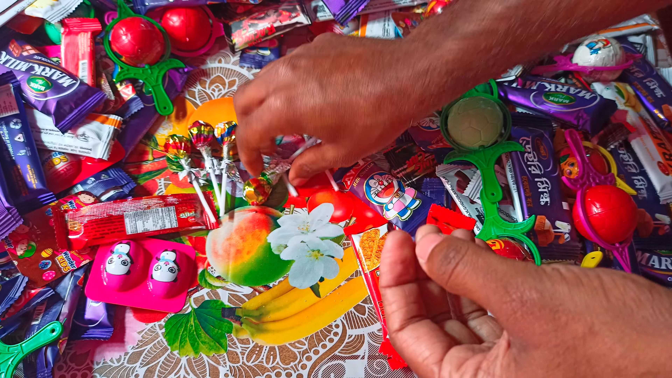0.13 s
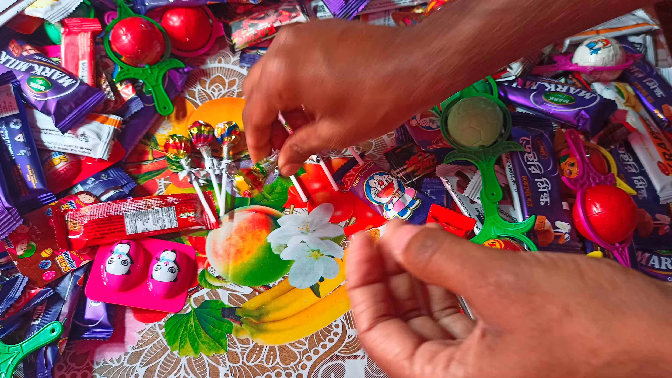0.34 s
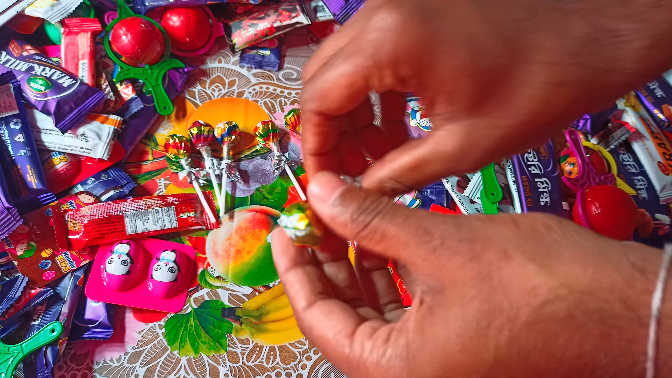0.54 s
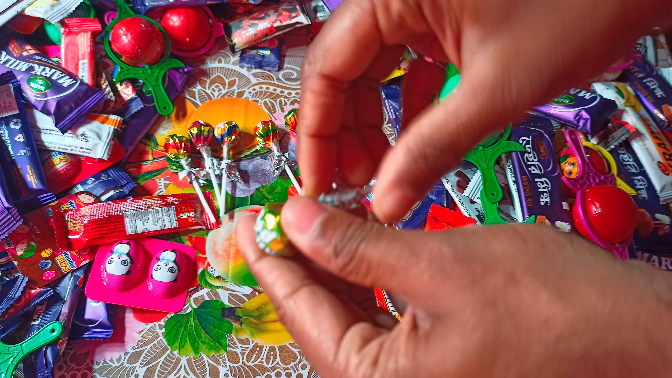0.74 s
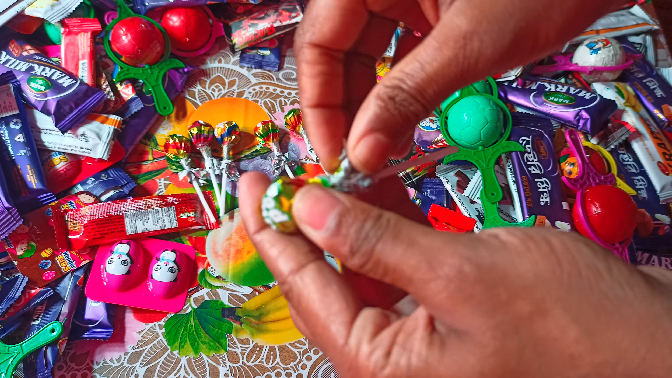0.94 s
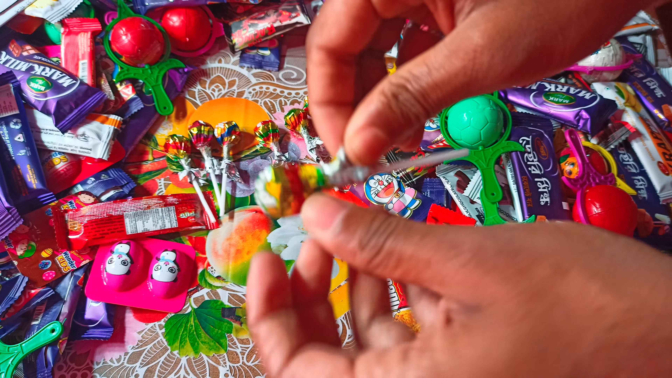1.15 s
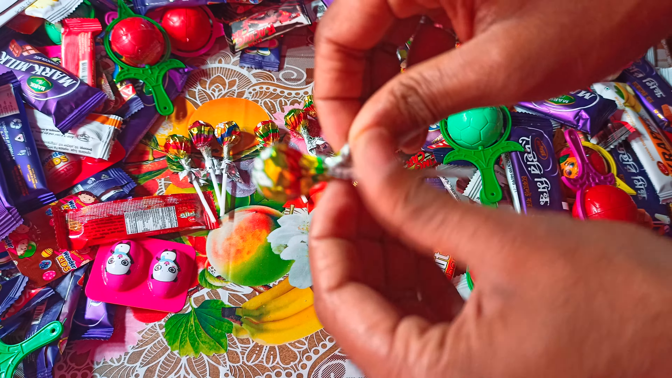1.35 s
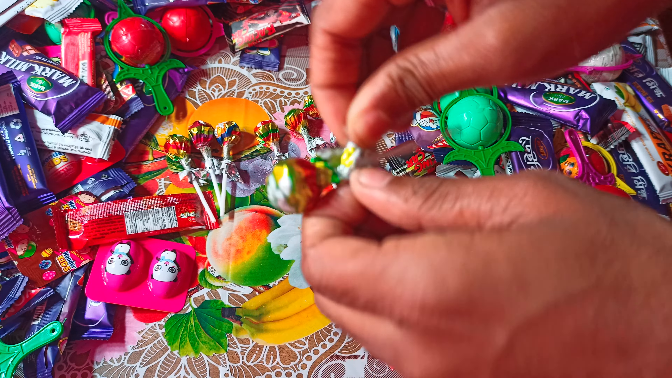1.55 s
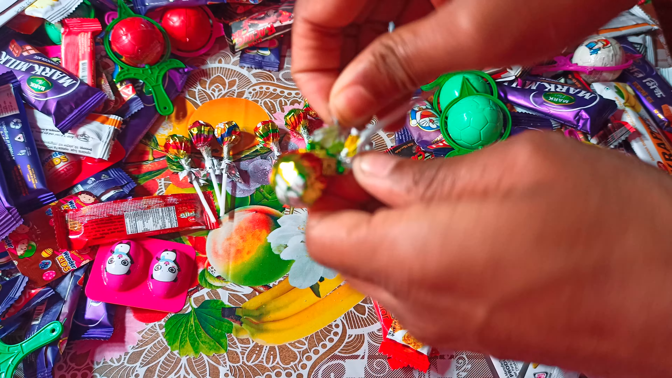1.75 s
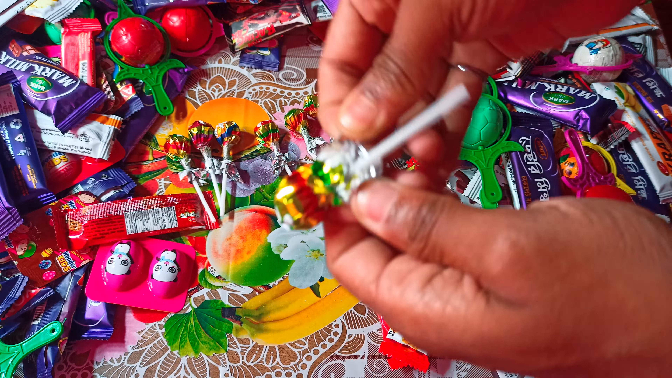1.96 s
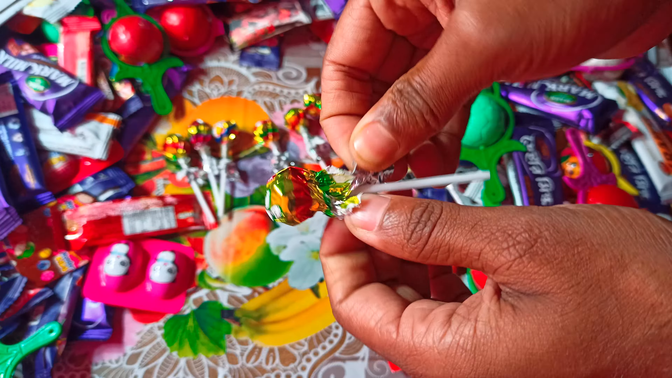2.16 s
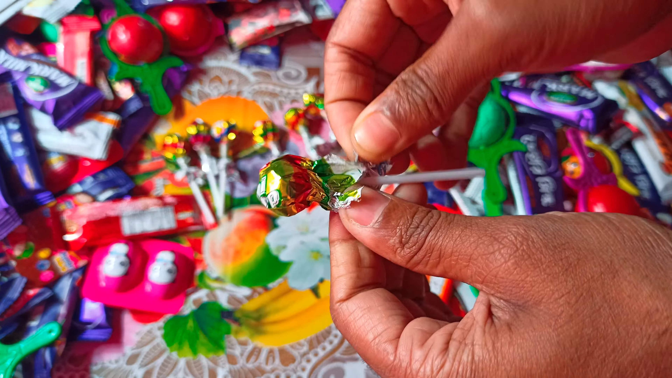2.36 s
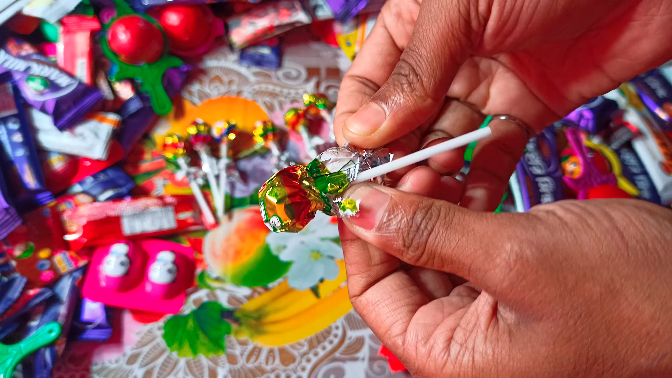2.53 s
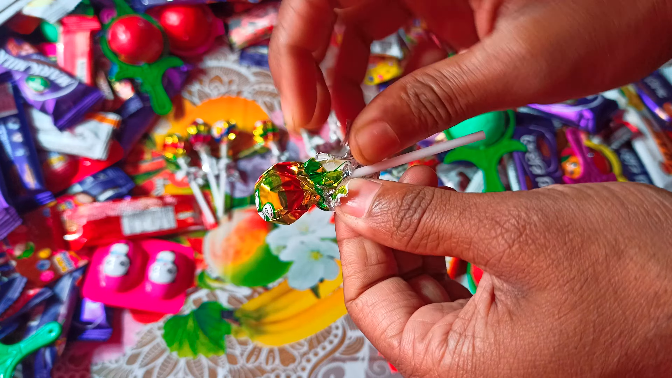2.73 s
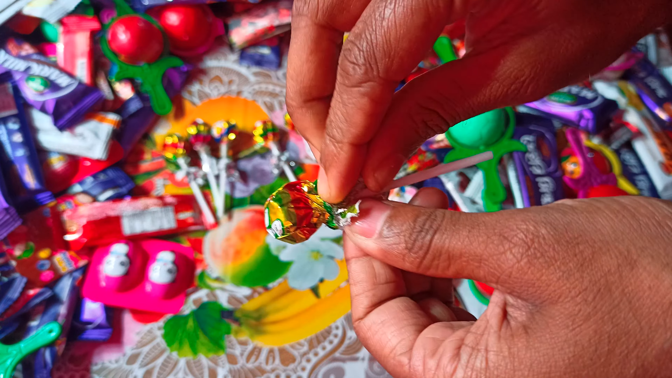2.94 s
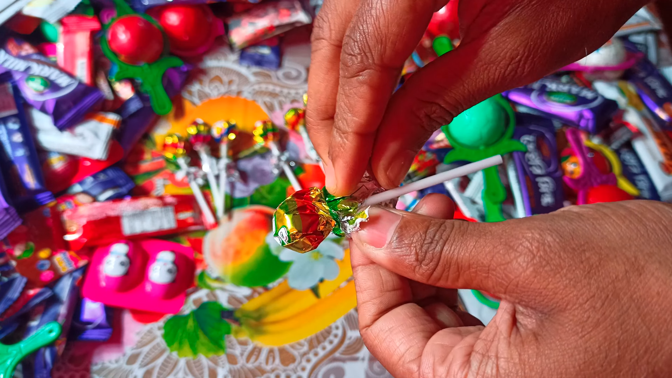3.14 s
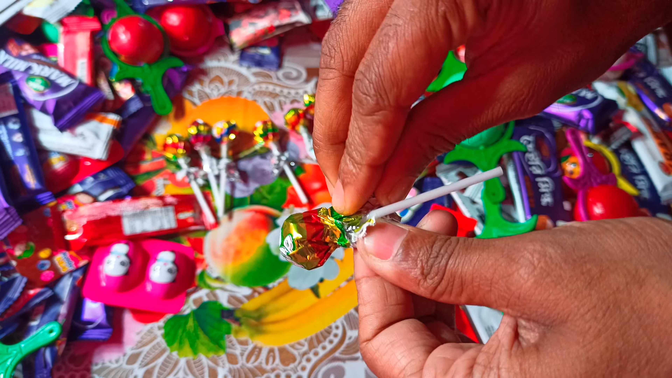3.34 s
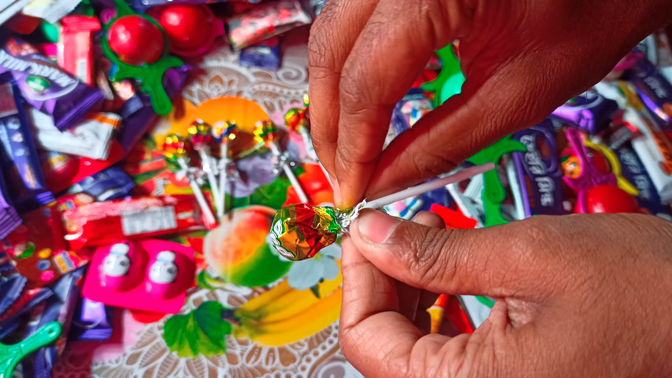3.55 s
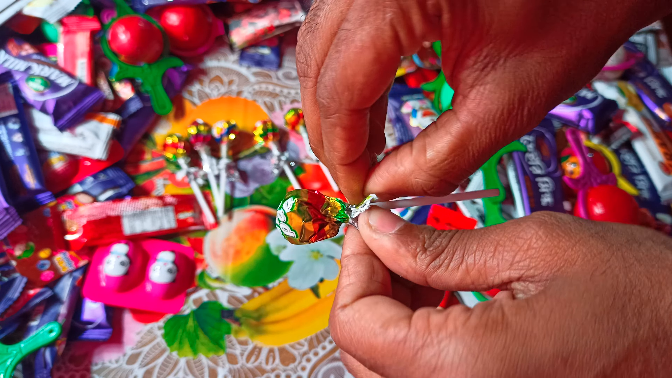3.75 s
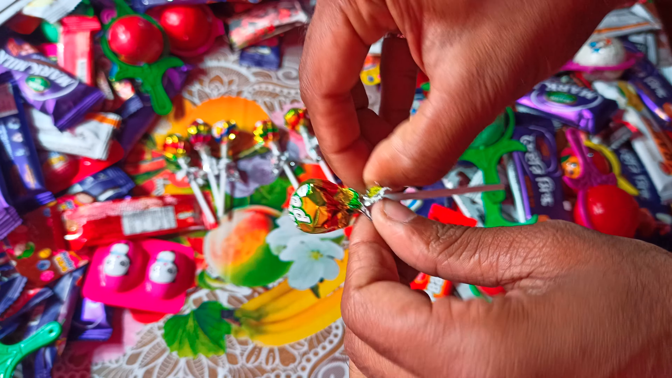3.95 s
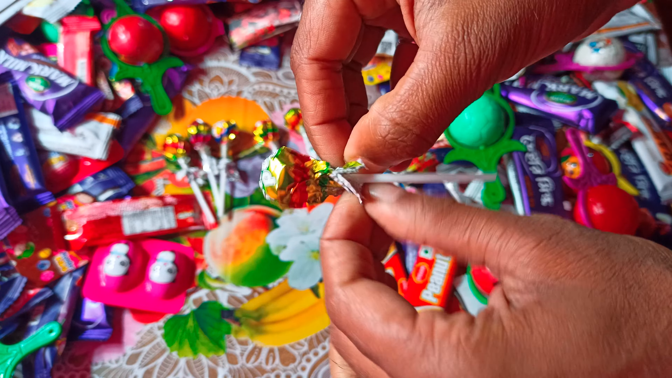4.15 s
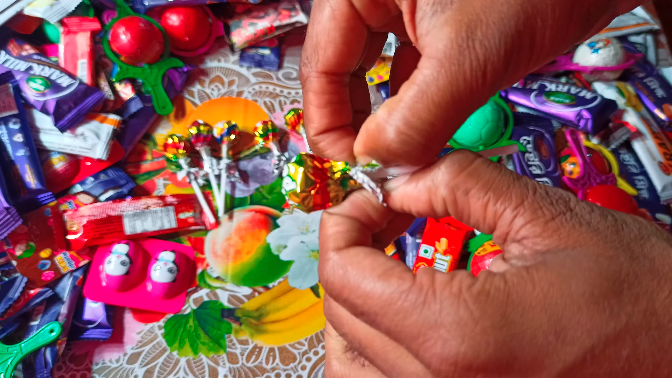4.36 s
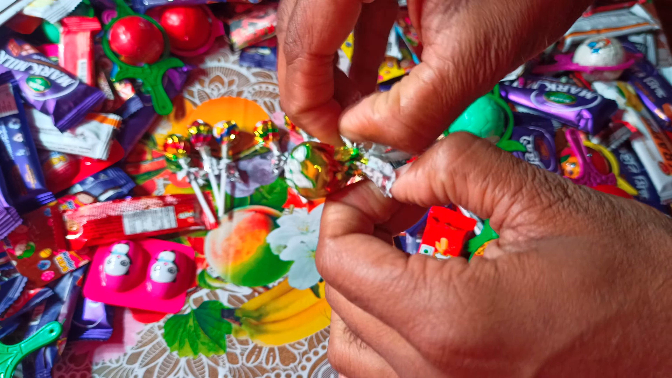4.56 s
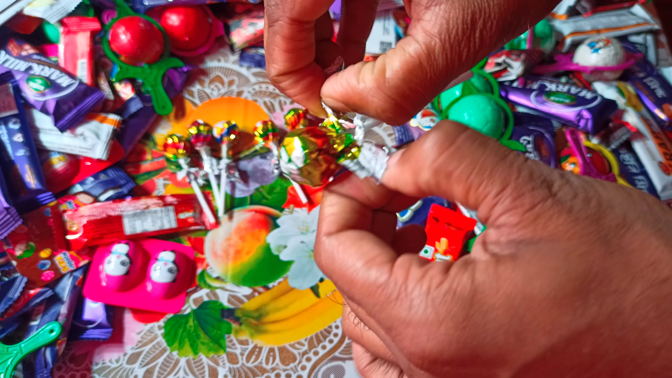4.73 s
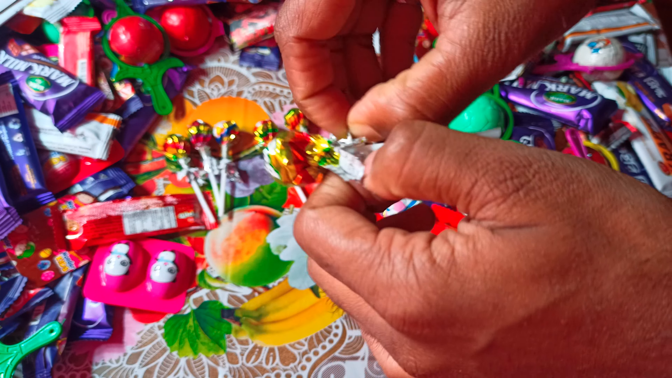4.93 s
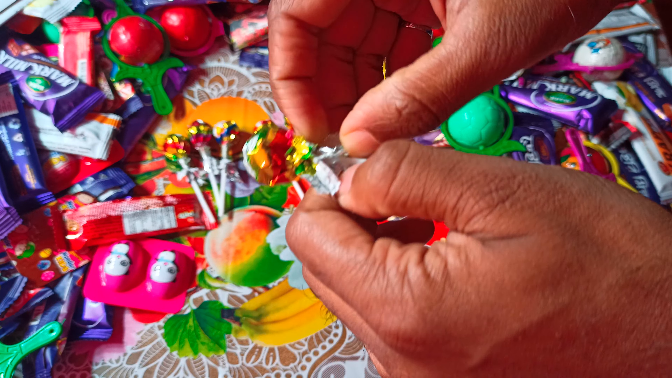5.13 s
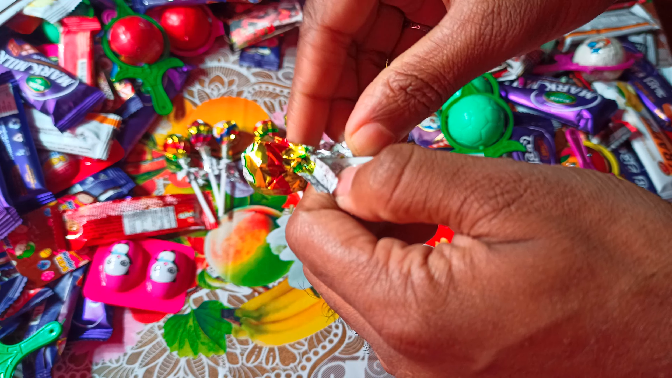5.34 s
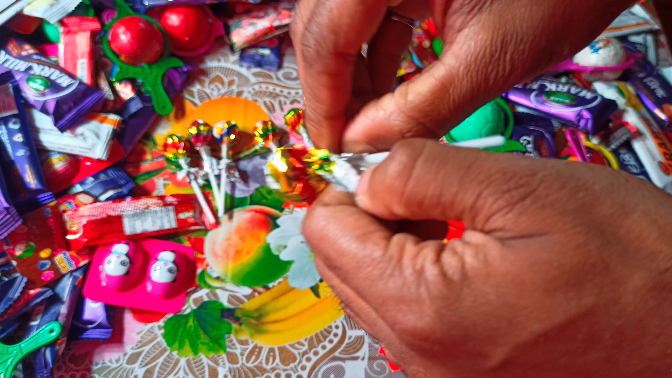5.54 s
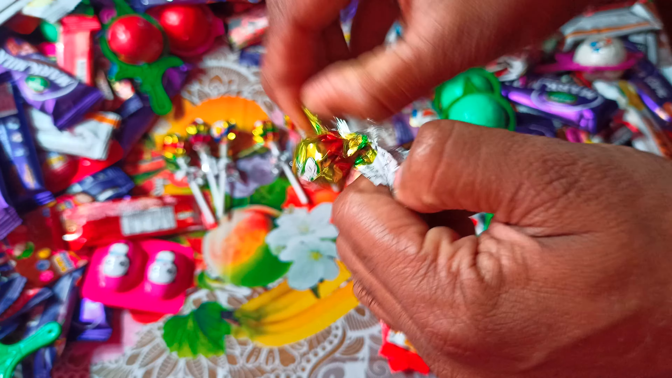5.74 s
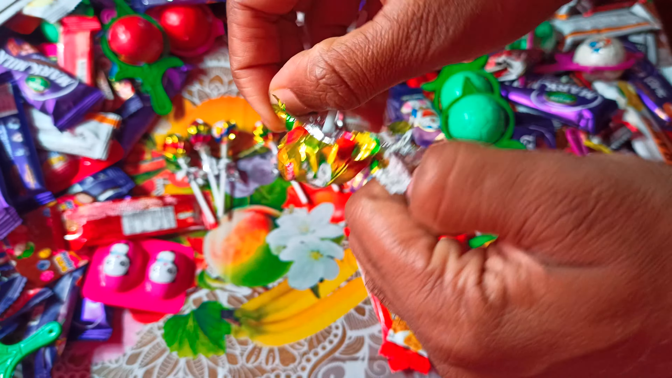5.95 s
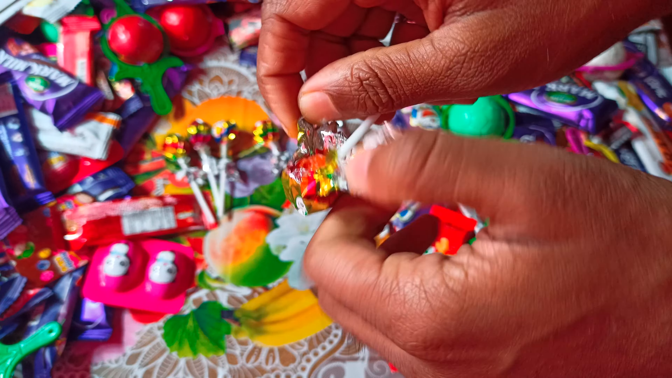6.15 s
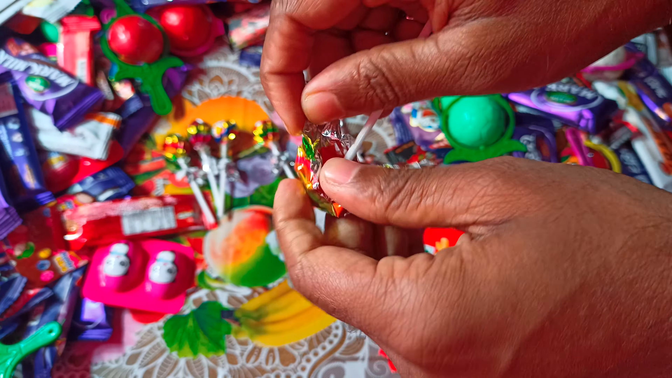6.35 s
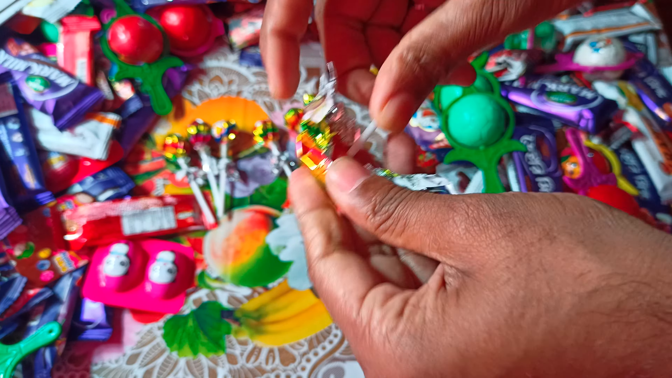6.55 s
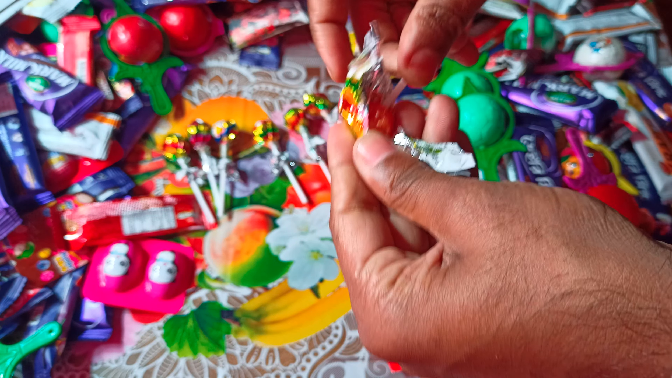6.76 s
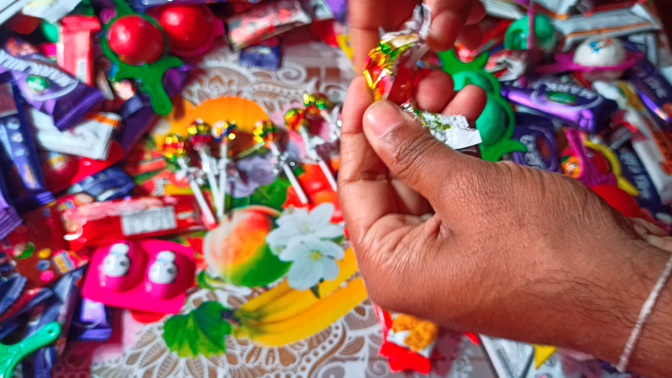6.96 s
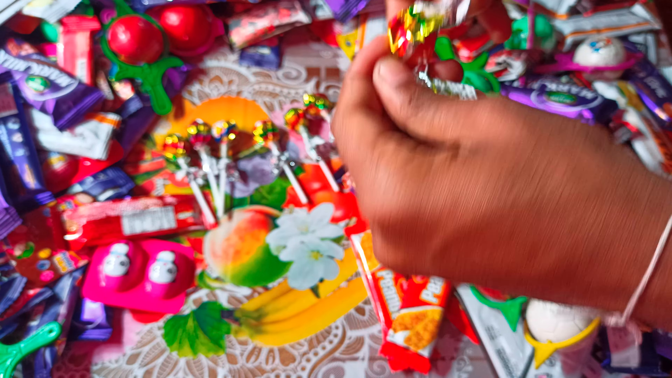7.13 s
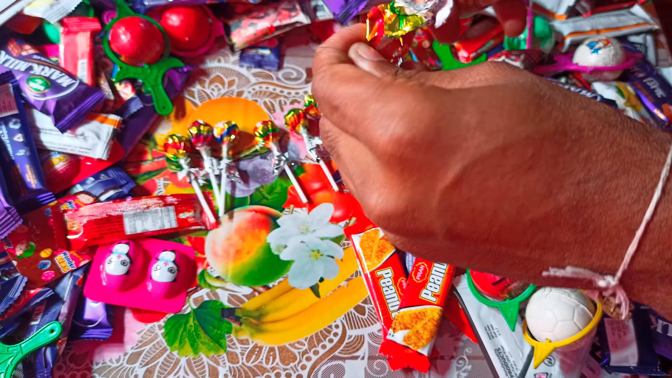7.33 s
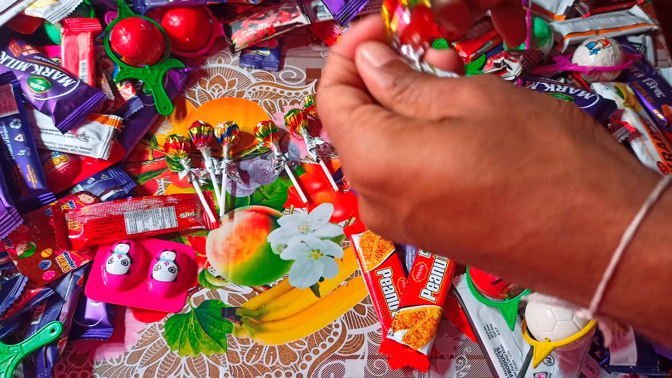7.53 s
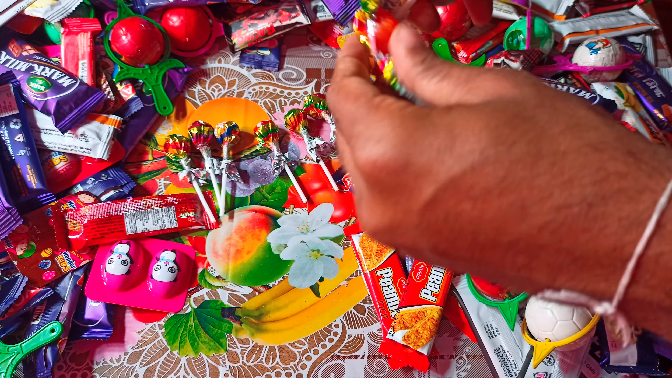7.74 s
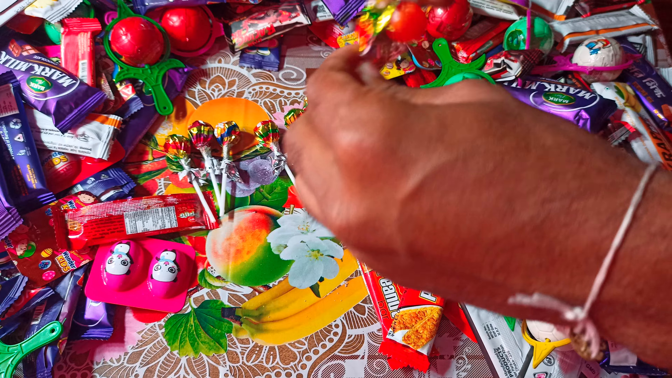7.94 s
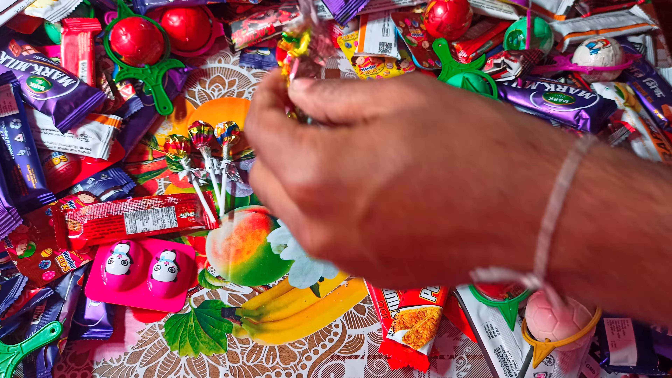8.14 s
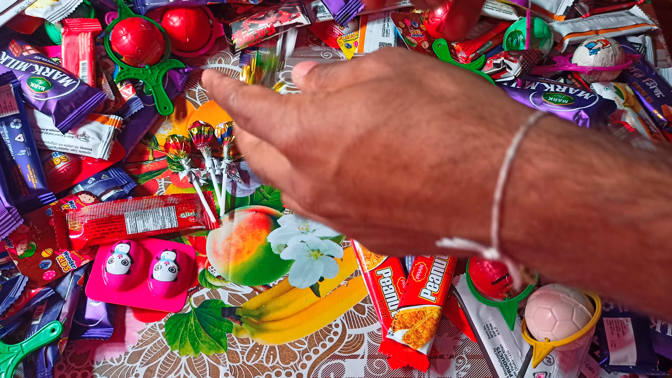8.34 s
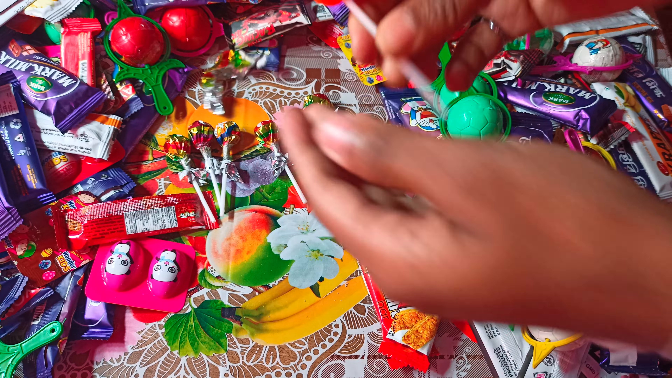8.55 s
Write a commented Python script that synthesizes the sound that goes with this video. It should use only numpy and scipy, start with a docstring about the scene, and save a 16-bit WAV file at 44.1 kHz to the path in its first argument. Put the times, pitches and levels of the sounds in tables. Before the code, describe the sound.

Dry, bright plastic film is twisted and peeled by hand, very near the microphone. It opens with dull low thuds and a brief rub, then isolated clicks and soft crinkle flurries. Strong crackles burst out midway and become fuller, almost continuous rustling with a few tiny pops as the wrapper comes off. Short room reflections surround it; the quiet background ducks whenever the wrapper rests.

```python
"""A plastic lollipop wrapper is twisted, crinkled and torn by fingers, close to a phone in a small quiet room.
Each crease radiates a spike and a dying puff of noise in four bands, singly or in swarms set off by squeezes.
Air pockets pop as decaying sines and the hand thuds as low noise bursts; far off, thin gliding tones whistle.
Shaped noise gives the room's air and low drone. The phone's noise suppressor follows the level and pulls
everything down whenever the wrapper rests."""
import sys
import numpy as np
from scipy import signal
from scipy.fft import rfft, irfft, next_fast_len
from scipy.io import wavfile
from scipy.ndimage import uniform_filter1d

SR = 44100
rng = np.random.default_rng(int(sys.argv[2]) if len(sys.argv) > 2 else 0)


def dump(signal):
    """Clip the signal to [-1, 1] and save it as 16-bit WAV at the path in sys.argv[1]."""
    limited = np.clip(np.atleast_2d(signal).T, -1, 1)
    pcm = np.round(limited * 32767).astype(np.int16)
    wavfile.write(sys.argv[1], SR, pcm)


N = 383222

# Loud crease snaps, before reflections and microphone: (time [s], main crease level [dB],
# broad fold against main [dB], fine edge against main [dB])
CREASE_SNAPS = [(0.1857, -41.5, -17, -13), (0.1951, -38.5, -24, 1), (0.2772, -44, -12, -14),
                (0.3543, -33, -30, -5), (0.7322, -44, -20, 0), (0.7417, -37.5, -24, -5),
                (0.7905, -39, -6, -17), (1.0844, -45, -16, 2), (1.098, -35, -29, -8),
                (1.1063, -39, -20, -15), (1.1114, -35.5, -18, -2), (1.1819, -43, -28, 3),
                (1.189, -36.5, -27, 0), (1.2227, -32, -19, -1.5), (1.3639, -42.5, -19, -9),
                (1.4013, -36.5, -30, -7), (1.446, -42, -12, -11), (1.5324, -39.5, -18, -9),
                (1.563, -44.5, -22, -11), (1.6424, -33.5, -24.5, -3), (1.651, -31.5, -19, -13),
                (1.657, -34, -51.5, -4), (1.6617, -31.5, -26, -9), (1.671, -29.5, -28, -5),
                (1.6878, -28, -35, -9), (1.8399, -34, -18, -2), (1.8539, -34.5, -25, -1),
                (1.874, -35, -25, -16), (1.898, -35, -33, 3), (1.9083, -42, -33, 3), (1.9475, -43, -29, 7),
                (1.9758, -41, -23, 8.5), (1.986, -44, -38, 9), (1.9938, -45, -25, 10.5),
                (2.0087, -45, -28, 9), (2.0632, -35.5, -20, 6.5), (2.0841, -39, -15, -10),
                (2.1375, -54.5, -3, 11), (2.253, -30.5, -15.5, -6), (2.3048, -33.5, -39, -6),
                (2.3114, -34, -41, -15), (2.5525, -38.5, -50, -3), (2.6138, -43, -40, -0.5),
                (2.627, -46, -42, -2), (2.6508, -46.5, -38, -3), (2.8115, -56.5, -20, 12),
                (2.818, -46, -37, -11), (2.9386, -48, -13, -5), (2.9627, -53.5, -11, 11.5),
                (3.1062, -47.5, -40, -2), (3.3717, -35.5, -26, -11), (3.4138, -52.5, -13, 7),
                (3.4796, -55.5, -17, 13.5), (3.6244, -49, -33, -3), (3.6521, -45.5, -38, 1),
                (3.7419, -44, -26, 8.5), (3.7494, -39, -25, -2), (3.8476, -46, -15, 8.5),
                (3.8648, -49.5, -12, 9.5), (3.9061, -36, -21, 0), (3.9132, -39, -21, 4),
                (3.9258, -43, -11, 4), (3.9379, -46, -24, 7), (3.9547, -43.5, -13, 2),
                (3.9953, -40, -17, -4), (4.026, -39, -24, -2), (4.0585, -51, -7, 13),
                (4.144, -35.5, -42, -23), (4.2373, -37, -18, 5), (4.245, -39, -29, -56),
                (4.3253, -28.5, -22.5, 1.5), (4.4042, -34, -18, 7), (4.4086, -24.5, -22, 1),
                (4.4509, -36, -28, 6), (4.5201, -18.5, -32.5, -5), (4.5308, -25, -19.5, -4),
                (4.5397, -24.5, -38.5, -1.5), (4.5506, -17.5, -22.5, -5.5), (4.5595, -20, -34, 2),
                (4.644, -45, -27, 13), (4.671, -19.5, -13.5, -2), (4.7174, -18.5, -13.5, -2.5),
                (4.7247, -21.5, -17, -11), (4.8574, -32.5, -16, 0.5), (4.8664, -33, -6, -1),
                (4.9214, -27.5, -9.5, 0.5), (4.977, -32, -9.5, -3), (4.9833, -37, -6.5, -3),
                (5.015, -23, -19.5, -3), (5.0274, -35, -12, 3), (5.0705, -40, -6, 3), (5.1545, -41, -2, -7),
                (5.1644, -34.5, -28, 0), (5.1842, -31.5, -19, -2), (5.232, -43.5, -8.5, 3.5),
                (5.3527, -42, -5.5, -1), (5.442, -42.5, -9, -6), (5.5783, -31, -8, -0.5),
                (5.6002, -40, -24, 5), (5.631, -39.5, -32, -12), (5.683, -32, -7.5, 2),
                (5.6976, -26.5, -15.5, -6), (5.7196, -16.5, -20.5, -18), (5.7609, -30.5, -29, -4),
                (5.7847, -32.5, -18, -8), (5.8282, -20.5, -5.5, -6), (5.8339, -32, -53, 6),
                (5.8544, -19, -16.5, 3), (5.8844, -27, -28.5, -19), (5.9657, -23, -21.5, -5.5),
                (5.99, -30, -39, -7), (5.9991, -30, -39, -6), (6.014, -36, -31, -2),
                (6.0366, -33.5, -40, -1), (6.0552, -33.5, -25, -3), (6.0697, -28, -20.5, -9),
                (6.0783, -35, -5, 1), (6.0961, -28, -3, -2), (6.185, -40, 10, 4), (6.192, -35.5, 8, 5),
                (6.2091, -36.5, 1, 4.5), (6.2808, -36.5, -2, -6), (6.303, -32.5, -13, -1),
                (6.3092, -38, 5.5, -3), (6.3487, -29.5, -8, -10.5), (6.3946, -34, -22, -2.5),
                (6.447, -37, -1, -12), (6.4638, -20, -13, -5), (6.4754, -18, -6.5, -10),
                (6.4828, -32.5, 2, 0), (6.4893, -31, -7, -6), (6.5284, -22.5, -13, -13),
                (6.5825, -31.5, -2, -15), (6.5996, -38, -1, 8.5), (6.61, -35.5, -53, -7),
                (6.6236, -32, -13, -7), (6.663, -31, -27, -1.5), (6.681, -24.5, -45, 0),
                (6.7022, -29.5, -6, -12.5), (6.7297, -25, -13, -9), (6.7617, -26.5, 3, 3),
                (6.7771, -30, -14, -5), (6.7862, -25.5, -22.5, -0.5), (6.8076, -21.5, -12, -4.5),
                (6.8235, -28, -8.5, -19.5), (6.8608, -27, -5, -12), (6.8787, -21.5, -37, -6.5),
                (6.9264, -18, -26.5, -4), (7.0602, -42.5, -1, 3.5), (7.122, -36.5, -15, -7),
                (7.1275, -40, -9.5, 1), (7.135, -35, -13, 5.5), (7.1583, -33, -7, -1),
                (7.1702, -32.5, -11.5, 5.5), (7.2384, -35.5, -6.5, -1), (7.2547, -26, -13, -1),
                (7.2743, -26.5, -10, -10), (7.2939, -25.5, -5.5, -8), (7.3123, -41.5, 7, -16),
                (7.3668, -38.5, -12, 5), (7.3893, -29, -29, -2), (7.4255, -33, -2.5, -5),
                (7.4462, -36.5, -5, -6), (7.5029, -28.5, -19.5, -3), (7.5146, -34, -18, 7.5),
                (7.5215, -36.5, -33, -5), (7.5573, -33.5, -12, -3), (7.5805, -40, -17, -13),
                (7.6588, -26.5, -19.5, -2), (7.7047, -31, -13, -1), (7.714, -29.5, -3, 1),
                (7.7328, -38, -7, 9.5), (7.7435, -37, -20, -4), (7.7725, -26.5, -33, 2),
                (7.8319, -33, -5.5, -26), (7.8426, -26.5, -12.5, -9), (7.855, -27.5, -40, 2),
                (7.912, -36, -28, 2.5), (7.9487, -27.5, -24, -6), (7.9747, -29.5, -8, 4.5),
                (7.9828, -19, -23, -6), (8.0035, -19.5, -12.5, -11), (8.0196, -28, -40, -13),
                (8.0278, -30, 4.5, -2), (8.0456, -33, -22, 5), (8.254, -42, -3, -8),
                (8.2599, -27.5, -11, -16), (8.321, -35.5, -14, -5), (8.5169, -39.5, -3.5, -8.5),
                (8.5516, -57, 19.5, -5)]
# Four crease sizes, broad fold, middle, main, fine edge: (low edge [Hz], high edge [Hz],
# snap t60 [s], room t60 [s], room level against near sound [dB])
CREASE_SIZES = [(550, 3530, 0.015, 0.39, -10.5), (2710, 5630, 0.022, 0.32, -9.5),
                (5720, 9400, 0.012, 0.33, -13), (8850, 15200, 0.015, 0.11, -13)]
# Share of each crease size in the swarm, in the same order: (level [dB])
SWARM_SIZE_DB = (1, 0, -1.5, -1)
# Finger squeezes or twists, each setting off a swarm of small creases:
# (time [s], hold [s], level [dB], fine edges against it [dB])
FINGER_SQUEEZES = [(0, 0.01, -54.5, 3.5), (.21, 0.12, -48, -4.5), (.485, 0.04, -55, -9),
                   (0.618, 0.067, -46, -2.5), (.79, 0.0091, -47, -1), (0.898, .19, -50.5, 1),
                   (1.14, 0.093, -44, -3.5), (1.41, 0.035, -56, -7), (1.48, 0.048, -49.5, 4),
                   (1.6, 0.022, -49, -1), (1.658, 0.032, -35, 5), (1.858, 0.057, -37, 7.5),
                   (2.08, 0.24, -48, 4.5), (2.3, 0.01, -42.5, -4), (2.4, 0.077, -53, 3.5),
                   (2.508, 0.013, -42.5, 4.5), (2.76, 0.035, -53.5, -4), (2.82, 0.0045, -53, -1),
                   (2.98, .01, -52.5, 0), (3.13, .1, -60, -5), (3.37, 0.086, -52, -8),
                   (3.52, .1, -62.5, 11), (3.68, 0.063, -51, 1), (3.76, 0.022, -41, 4),
                   (3.92, 0.12, -52, 5), (4.128, 0.0042, -37.5, 1.5), (4.26, 0.028, -43, 4),
                   (4.42, 0.015, -46.5, 9), (4.546, 0.004, -31, -0.5), (4.719, 0.015, -31.5, 1),
                   (4.92, 0.13, -42, 0), (5.1, 0.15, -43.5, -7), (5.37, 0.34, -55.5, 2.5),
                   (5.588, 0.031, -35, -1), (5.71, 0.014, -32.5, -5), (5.839, 0.05, -30.5, -0.5),
                   (6.148, 0.11, -37, -3), (6.476, 0.0045, -35, -3), (6.6, 0.19, -47.5, 1),
                   (7.03, 0.044, -53.5, 6), (7.14, .04, -43, -9), (7.28, .2, -48.5, 4.5),
                   (7.62, 0.042, -46, 3.5), (7.7, 0.15, -39, -2.5), (7.992, 0.036, -33.5, -1),
                   (8.17, .06, -53.5, 0.5), (8.278, 0.02, -43.5, -2.5), (8.528, 0.071, -48.5, -6)]
# The foil comes loose, broad folds in the swarm: (time [s], level [dB])
LOOSE_FOIL = [(0, -5.5), (.5, -16.5), (2, -24), (4, -18.5), (5.5, -20), (6.2, -6.5), (7, -12.5), (8.69, -5)]
# Reflections from hands and table: (delay [s], level [dB])
NEAR_REFLECTIONS = [(.0023, -16.5), (.0043, -13.5), (.0075, -20)]
# Microphone response to the wrapper: (frequency [Hz], gain [dB])
MICROPHONE_COLOUR = [(300, -5), (1100, -7), (1550, 2.5), (3000, -5.5), (3800, 1), (6000, 1.5), (7500, 7),
                     (9500, 0), (12000, -1), (15000, 11)]
# Air pockets giving way: (time [s], level [dB], frequency [Hz], t60 [s])
AIR_POPS = [(5.854, -51, 870, 0.0065), (6.9265, -29.5, 424, 0.0054), (8.0285, -29, 590, 0.028),
            (8.073, -43, 620, .04)]
# Hand in the sweets: (time [s], level [dB], centre frequency [Hz], t60 [s])
HAND_THUDS = [(0, -37, 130, 0.18), (.034, -39.5, 144, 0.47), (0.188, -62, 138, 0.22),
              (.256, -39.5, 122, 0.11), (0.299, -49, 150, 0.22)]
# Faint far whistles: (time [s], length [s], first pitch [Hz], last pitch [Hz], level [dB])
FAR_WHISTLES = [(.46, 0.18, 2900, 2840, -72), (3.132, 0.18, 2720, 2610, -60)]
# Spectrum of the room air: (frequency [Hz], relative density [dB per Hz])
ROOM_AIR = [(15, -24), (25, -34), (108, -0.5), (309, -6.5), (516, -10.5), (1160, -22.5), (2160, -26),
            (2610, -21.5), (3250, -23.5), (5880, -23.5), (7110, -26.5), (11600, -30), (16000, -17.5)]
# Wavering drone: (centre frequency [Hz], Gaussian width [Hz], level [dB])
ROOM_HUM = [(56.4, 7.7, -70), (83.3, 4.6, -64.5), (99.9, 2.2, -61), (161.7, 9.2, -69), (192.3, 11, -65.5)]

# The middle crease lies between the broad fold and the main one, with random scatter
MIDDLE_SHARE, MIDDLE_DB, MIDDLE_SCATTER_DB = 0.48, 1.37, 6
SWARM_CREASES_PER_S = 500
SWELL_DB_PER_S, SETTLE_DB_PER_S = 332, 228  # build-up before a squeeze, decay after it
CLICK = 7.25  # one-sample flip of a crease, against the noise after it
SPIKE_T60_S, SPIKE_RISE_S = 0.0008, 0.00011
ROOM_DELAY_SAMPLES = 300
WHISTLE_EDGE_S = 0.017
LOW_CUT_HZ, TOP_HZ = 40, 16000


def amp(db):
    """Decibel law: amplitude grows tenfold every 20 dB."""
    return 10 ** (np.asarray(db) / 20)


def unit(x):
    """Normalization to unit root-mean-square amplitude."""
    return x / np.sqrt(np.mean(x ** 2) + 1e-20)


def along(points, hz):
    """Linear interpolation of (frequency, value) points on a logarithmic frequency axis."""
    f, v = np.transpose(points)
    return np.interp(np.log(hz + 1), np.log(f + 1), v)


def filtered(x, response):
    """Linear filtering: the spectrum is multiplied by a frequency response."""
    m = next_fast_len(N + SR // 4)
    spectrum = rfft(x, m) * response(np.fft.rfftfreq(m, 1 / SR))
    return irfft(spectrum, m)[:N]


def band(x, lo_hz, hi_hz):
    """Causal band-pass, with gain restoring the power white noise loses outside the band."""
    sos = signal.butter(3, [lo_hz, min(hi_hz, SR * .45)], "band", fs=SR, output="sos")
    return signal.sosfilt(sos, x) * np.sqrt(SR / 2 / (hi_hz - lo_hz))


def fading(power, t60):
    """Exponential energy decay: power falls 60 dB in t60, its sum conserved."""
    keep = amp(-120 / (t60 * SR))
    return np.abs(signal.lfilter([1 - keep], [1, -keep], power))


def wrapper():
    """Buckling film: creases release impulsive noise, reflected nearby and reverberated by the room."""
    s, main_db, fold_db, edge_db = np.transpose(CREASE_SNAPS)
    scatter_db = MIDDLE_SCATTER_DB * rng.standard_normal(len(s))
    middle_db = MIDDLE_DB + MIDDLE_SHARE * fold_db + scatter_db
    snap_db = main_db + np.array([fold_db, middle_db, 0 * s, edge_db])

    # Columns drawn: time, overall size, then one spread for each crease size
    draw = rng.random((int(SWARM_CREASES_PER_S * N / SR), 6))
    when = draw[:, 0] * N / SR
    level_db, bright_db = squeezes(when)
    size_db = level_db - 5.29 * np.log(draw[:, 1] + 0.018) - 14.5  # many small, few large

    out = np.zeros(N)
    for k, (lo_hz, hi_hz, t60, room_t60, room_db) in enumerate(CREASE_SIZES):
        swarm_db = size_db + SWARM_SIZE_DB[k] + 9 * (draw[:, 2 + k] - .5)
        if k < 2:  # the two lower bands follow the loosening foil, the second less strongly
            loose_db = np.interp(when, *np.transpose(LOOSE_FOIL))
            swarm_db = swarm_db + loose_db / (1 + 1.85 * k)
        if k == 3:
            swarm_db = swarm_db + bright_db
        near = bursts(s, snap_db[k], t60, spike=5.7, length=1000)
        near += bursts(when, swarm_db, 0.49 * t60, spike=0.35, length=256)
        near = near + sum(amp(db) * np.pad(near, (round(d * SR), 0))[:N] for d, db in NEAR_REFLECTIONS)

        # Diffuse reverberation: noise whose power follows the delayed, fading near sound
        delayed = np.pad(near, (ROOM_DELAY_SAMPLES, 0))[:N]
        room = rng.standard_normal(N) * np.sqrt(fading(delayed ** 2, room_t60))
        out += band(near + amp(room_db) * room, lo_hz, hi_hz)
    return filtered(out, lambda hz: amp(along(MICROPHONE_COLOUR, hz)))


def bursts(s, db, t60, spike, length):
    """Impulsive release: a quick spike and dying noise, scaled by the level of the first 2 ms."""
    t = np.arange(length) / SR
    decay = amp(-60 * t / t60) + spike * amp(-60 * t / SPIKE_T60_S)
    rise = 1 - np.exp(-t / SPIKE_RISE_S)
    shape = rng.standard_normal((len(s), length)) * decay * rise
    shape[:, 2] += CLICK * spike / (1 + spike)
    shape /= np.sqrt(np.mean(shape[:, :SR // 500] ** 2, axis=1, keepdims=True))
    at = np.round(np.asarray(s) * SR).astype(int)[:, None] + np.arange(length)
    pressure = shape * amp(db)[:, None]
    return np.bincount(at.ravel(), pressure.ravel(), N + SR)[:N]


def squeezes(when):
    """Power summation of all squeezes, giving swarm level and power-weighted fine-edge level."""
    s, hold, db, edge_db = np.transpose(FINGER_SQUEEZES)[:, :, None]
    early = np.maximum(s - when, 0)
    late = np.maximum(when - s - hold, 0)
    envelope_db = db - SWELL_DB_PER_S * early - SETTLE_DB_PER_S * late
    power = amp(2 * envelope_db) + 1e-30
    total = power.sum(0)
    return 10 * np.log10(total), (power * edge_db).sum(0) / total


def pops():
    """Damped resonance: each air pocket in the folded foil gives one short decaying sine."""
    out, t = np.zeros(N), np.arange(SR // 10) / SR
    for s, db, hz, t60 in AIR_POPS:
        swing = amp(db - 60 * t / t60) * np.sin(2 * np.pi * hz * t)
        out[round(s * SR):][:len(t)] -= swing
    return out


def thuds():
    """Damped soft impact: the hand in the heap gives low noise bumps and a fading rub on packets."""
    out, t = np.zeros(N), np.arange(SR // 3) / SR
    for s, db, hz, t60 in HAND_THUDS:
        # The first half of the noise lets the filter settle
        push = band(rng.standard_normal(2 * len(t)), 0.57 * hz, 1.51 * hz)[len(t):]
        rise = (1 - np.exp(-t / 0.0017)) ** 2
        out[round(s * SR):][:len(t)] += amp(db - 60 * t / t60) * rise * push
    rub = band(rng.standard_normal(len(t)), 270, 1740)
    out[:len(t)] += amp(-54.0 - 60 * t / 0.71) * rub
    return out


def whistles():
    """Linear frequency sweep: the phase integrates a gliding pitch under soft ends."""
    out, t = np.zeros(N), np.arange(N) / SR
    for s, length, first_hz, last_hz, db in FAR_WHISTLES:
        u = np.clip(t - s, 0, length)
        soft = np.clip(np.minimum(u, length - u) / WHISTLE_EDGE_S, 0, 1)
        cycles = (first_hz + (last_hz - first_hz) * u / (2 * length)) * u
        out += amp(db) * soft * np.sin(2 * np.pi * cycles)
    return out


def room_tone():
    """Spectral shaping of random noise: broad air, and narrow bands whose beating wavers."""
    air = filtered(rng.standard_normal(N), lambda hz: amp(along(ROOM_AIR, hz)))
    out = amp(-57) * unit(air)
    for hz, width, db in ROOM_HUM:
        drone = filtered(rng.standard_normal(N), lambda f: np.exp(-.5 * ((f - hz) / width) ** 2))
        out += amp(db) * unit(drone)
    return out


def scene():
    """Superposition: the pressures of all sources add."""
    return (wrapper() + pops() + thuds() + whistles() + room_tone())[None]


def record(dry):
    """Level-dependent gain: opens at once on loud sound, sinks in pauses; then saturation and band limits."""
    heard = uniform_filter1d(fading(dry[0] ** 2, 0.19), size=300)
    level_db = 10 * np.log10(np.abs(heard) + 1e-12)
    gain_db = -16 / (0.5 + np.exp((level_db + 52.5) / 4))
    gated = dry[0] * amp(gain_db)
    rounded = gated / (1 + np.abs(gated / .9) ** 4) ** (1 / 4)  # the loudest peaks round off

    def passband(hz):
        """Band limitation: a steep upper edge and a gentler low cut."""
        upper = np.exp(-np.minimum(hz / TOP_HZ, 1.1) ** 100)
        return upper * (1 - np.exp(-(hz / LOW_CUT_HZ) ** 4))

    return filtered(rounded, passband)[None]


dry = scene()
out = record(dry)
dump(out)
```